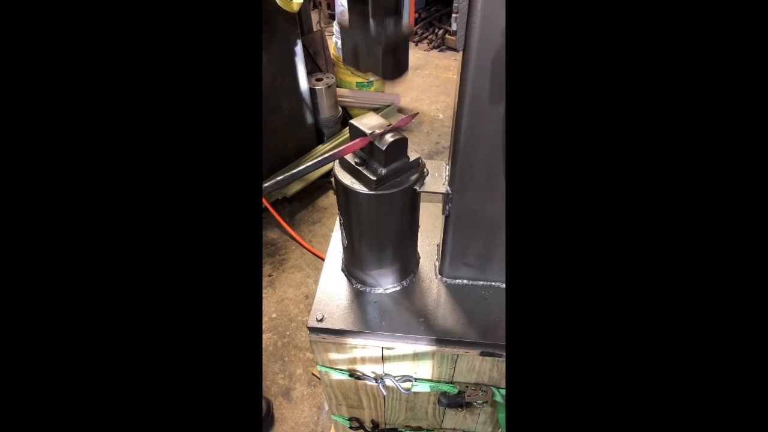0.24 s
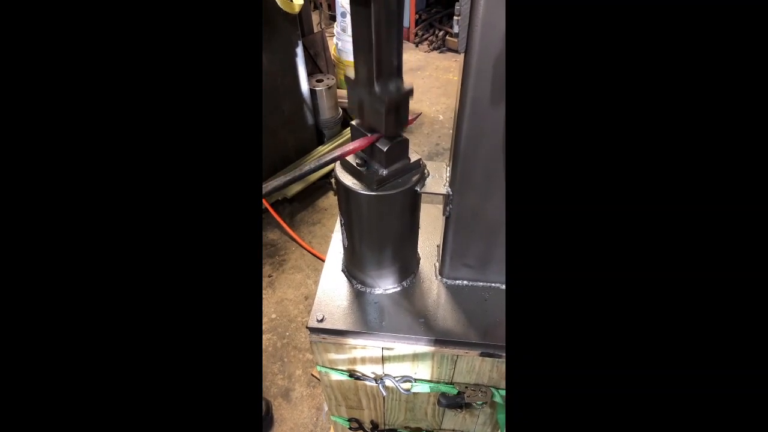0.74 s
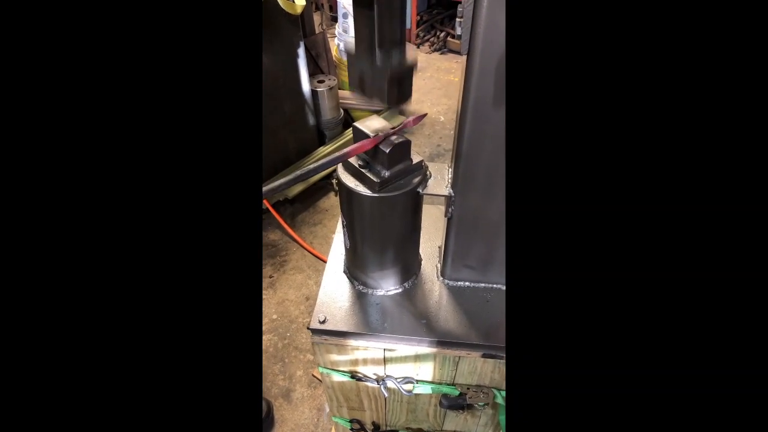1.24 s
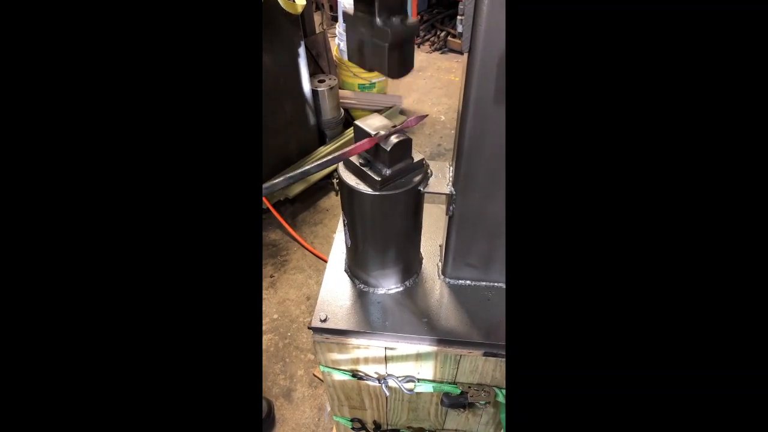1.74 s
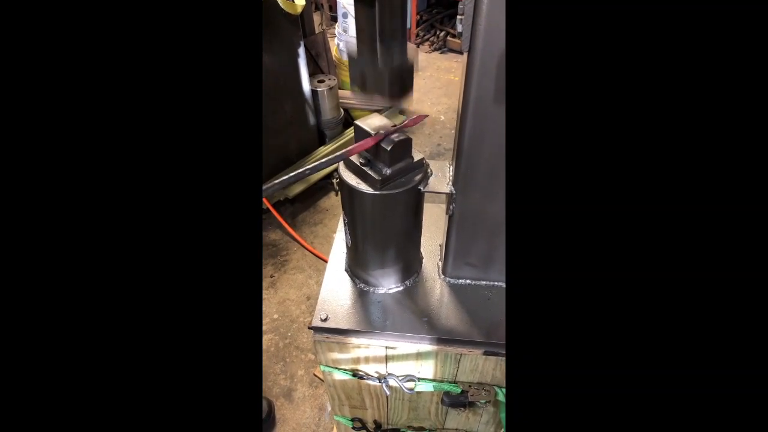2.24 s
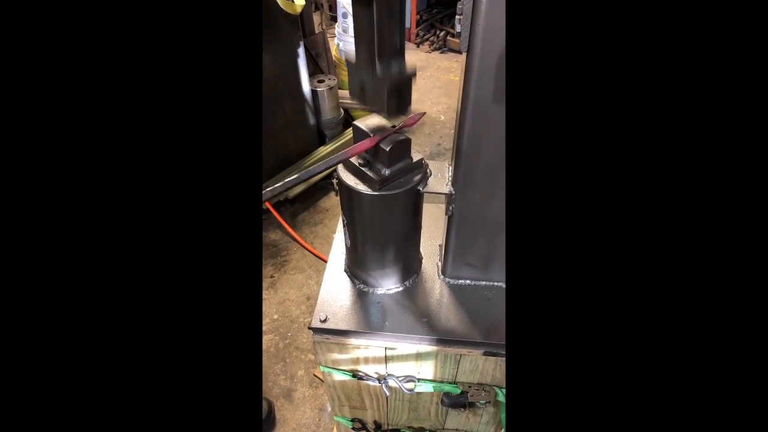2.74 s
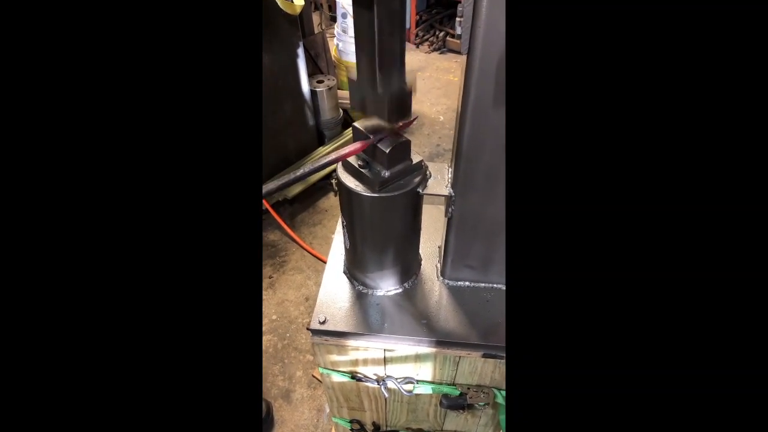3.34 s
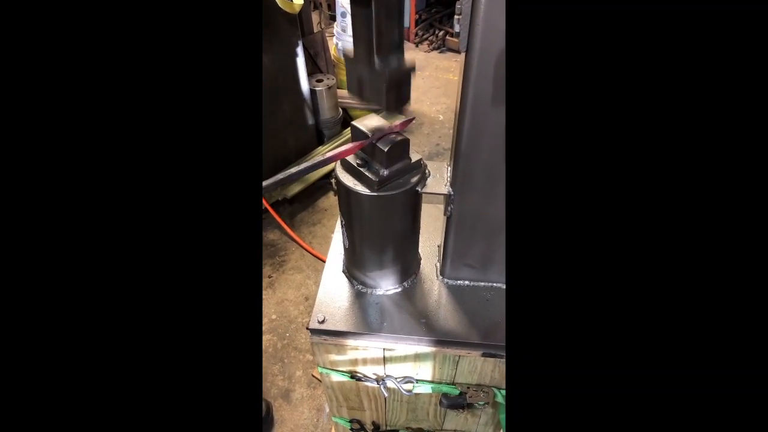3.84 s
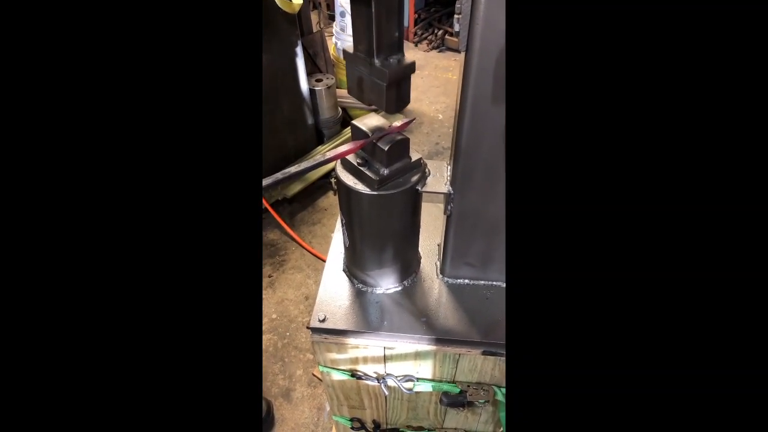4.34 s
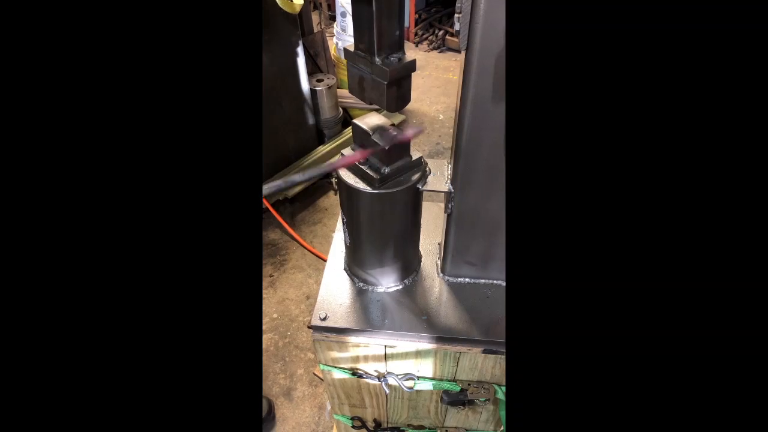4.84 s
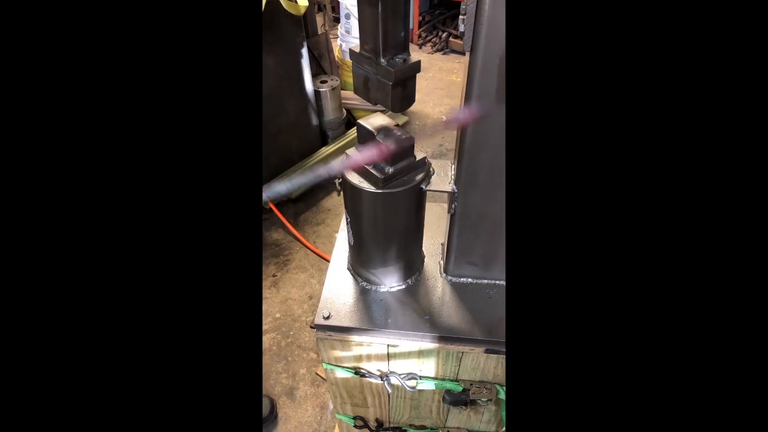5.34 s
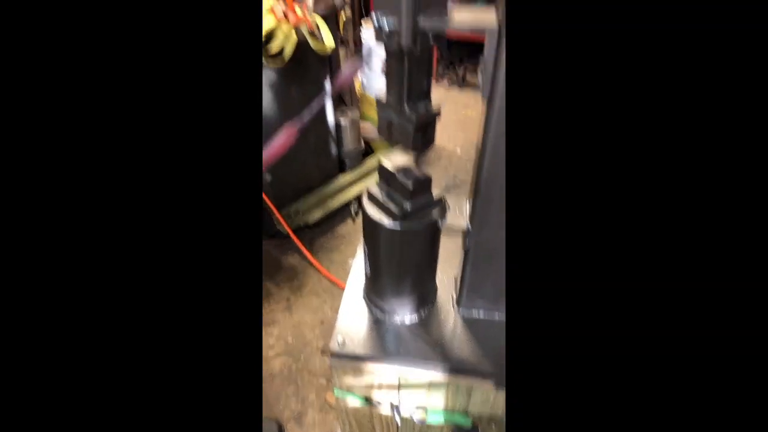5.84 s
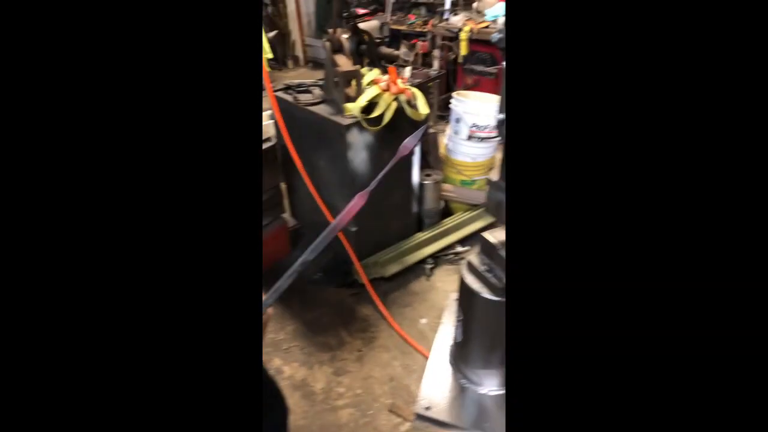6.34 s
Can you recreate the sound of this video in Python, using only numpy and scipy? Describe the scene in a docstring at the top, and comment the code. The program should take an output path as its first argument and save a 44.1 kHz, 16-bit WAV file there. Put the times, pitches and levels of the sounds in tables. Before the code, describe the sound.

Fast dull metallic thuds, four or five a second, beat through roaring exhaust air; the air abruptly cuts and a quiet motor chugging remains.

```python
"""Air-driven power hammer

A ram forges a hot steel bar close to a small microphone: clicks ring decaying modes for its blows
and for one faint low tone. Exhaust hiss, the valve's bright spits and the last wheeze of air are
coloured noise under envelopes. Once the air is shut off, a far compressor is left humming: ringing
strokes, hoots, tones, shop noise. A faint high rustle follows near the end."""
import sys
import numpy as np
from scipy import signal
from scipy.fft import rfft, irfft, next_fast_len
from scipy.io import wavfile

SR = 44100
rng = np.random.default_rng(int(sys.argv[2]) if len(sys.argv) > 2 else 0)


def int16_out(signal):
    """Quantize to a 16-bit WAV file."""
    q = np.round(np.clip(np.atleast_2d(signal).T, -1, 1) * 32767)
    wavfile.write(sys.argv[1], SR, q.astype(np.int16))


N = 291060

# Noise of the workshop. Each row: frequency in Hz, relative level in dB per Hz.
SHOP_COLOUR = [(30, -28), (54, -23), (68, 0), (110, -14.5), (160, -20), (230, -16), (300, -19), (430, -27),
               (660, -23.5), (850, -29.5), (1300, -29.5), (1700, -34.5), (2900, -36.5), (3600, -34),
               (5000, -39), (8000, -48), (11000, -55.5), (15800, -61.5)]
# Resonances in the shop noise. Each row: centre in Hz, width in Hz, lift in dB.
SHOP_RINGS = [(2160, 120, 2.5), (3420, 200, 3.5), (3800, 200, 2), (4700, 250, 5), (6430, 79.5, 3.5)]
# Compressor head and tank. Each row: mode in Hz, level in dB, t60 in seconds.
PUMP_MODES = [(83, -62.5, 0.27), (100.1, -52, .3), (474, -67, .3), (519, -47, 0.16), (559, -49, .12),
              (648, -57, 0.32), (847, -70, .4), (964, -53.5, 0.11), (1005, -54.5, 0.24), (1160, -63.5, .35),
              (1240, -50, .1), (1445, -72.5, 0.23)]
# Intake hoots. Each row: time into each turn in seconds, peak in dB, half width (to 1/e) in seconds.
CHUFFS = [(.0195, -44.5, .009), (.054, -49.5, .0045)]
# Steady tones of motors. Each row: frequency in Hz, level in dB rms.
HUM_TONES = [(65.5, -55), (68, -57), (120, -56.5), (331.7, -43)]
# Overtones of the stroke rate. Each row: multiple, level in dB rms.
STROKE_ORDERS = [(13, -57), (14, -64), (15, -61), (16, -53), (17, -61), (18, -56), (19, -56), (21, -61)]
# Thin motor whines. Each row: frequency in Hz, level in dB rms.
WHINE_TONES = [(1976, -72), (2161, -75.5), (2252, -73.5), (2697, -72.5), (3129, -79.5), (3343, -76.5),
               (3424, -73), (3849, -73.5), (4188, -73)]
# Compressor and shop, lower under the hammer. Each row: time in seconds, gain in dB.
COMPRESSOR_LEVEL = [(3.9, -4), (4.4, -1), (5.2, 0)]
# Faint high rustle. Each row: centre in seconds, peak in dB, half width (to 1/e) in seconds.
RUSTLES = [(6.5, -75, .02), (6.525, -66, 0.021), (6.585, -67, 0.025)]
# Rustle noise. Each row: frequency in Hz, relative level in dB per Hz.
RUSTLE_COLOUR = [(9000, -32), (9900, -3), (10800, 0), (11500, -25), (13000, -50)]
# Exhaust flow. Each row: time in seconds, level in dB.
EXHAUST_LEVEL = [(0, -14.5), (1, -14.5), (1.5, -15), (1.9, -17.5), (2.5, -14.5), (3, -15), (3.3, -16),
                 (4.1, -15), (4.285, -19), (4.315, -21), (4.345, -17), (4.365, -28.5), (4.4, -21.5)]
# Exhaust noise. Each row: frequency in Hz, relative level in dB per Hz.
HISS_COLOUR = [(100, -7), (300, -7), (600, -12.5), (900, -7.5), (1300, -5.5), (2000, -2.5), (3000, -3),
               (4300, -4.5), (5200, -1.5), (6000, -2), (8700, -3), (10000, -3.5), (12000, -5),
               (13300, -8.5), (14800, -5), (15800, -8.5)]
# Exhaust port resonances. Each row: centre in Hz, width in Hz, lift in dB (negative is a dip).
PORT_RINGS = [(1760, 19, 9.5), (1995, 120, 4), (2377, 86, 6.5), (2623, 96, 10), (2700, 31, 8),
              (3800, 300, 3), (4325, 40, 5), (5050, 40, 6), (5130, 39.5, 11), (5380, 120, 2.5),
              (5500, 38, 11), (5780, 40, 0.5), (5720, 47, 4.5), (6470, 270, 7), (7410, 51, 3.5),
              (7830, 72.3, 6), (8570, 170, 4.5), (9230, 170, 1.5), (10770, 150, 1), (11800, 100, 4.5),
              (12400, 220, 6.5), (1810, 81, -3.5), (2600, 60, -7.5), (2710, 30, -19.5), (4160, 90, -1.5),
              (5230, 65, 2.5), (6540, 100, -7), (9630, 100, -10.5), (13030, 93, -6)]
# Last air. Each row: time in seconds, level in dB.
WHEEZE_LEVEL = [(4.41, -71), (4.445, -34), (4.465, -37), (4.48, -56), (4.545, -49), (4.57, -57),
                (4.62, -85)]
# Wheeze noise. Each row: frequency in Hz, relative level in dB per Hz.
WHEEZE_COLOUR = [(900, -8.5), (1400, -6.5), (2000, -18.5), (2800, -5), (3600, -16.5), (6000, -30.5)]
# Wheeze resonances. Each row: centre in Hz, width in Hz, lift in dB.
WHEEZE_RINGS = [(1300, 120, 8), (2150, 110, 8), (2800, 80, 15), (4800, 150, 5), (6200, 150, 6)]
# Valve shifts. Each row: start in seconds, air pressure in dB.
VALVE_SHIFTS = [(0.11, -11.5), (0.326, -11.5), (0.54, -10.5), (0.757, -11.5), (0.977, -11), (1.192, -10.5),
                (1.41, -10), (1.626, -11.5), (1.847, -11.5), (2.071, -9.5), (2.295, -8.5), (2.512, -9.5),
                (2.72, -10), (2.934, -9.5), (3.147, -10), (3.373, -11), (3.589, -10), (3.804, -10.5),
                (4.033, -10), (4.298, -8.5)]
# Bright valve noise. Each row: frequency in Hz, relative level in dB per Hz.
SPIT_COLOUR = [(3000, -39.5), (6000, -18.5), (9000, -10.5), (12000, -10.5), (15500, -6)]
# Longer-running filling noise. Each row: frequency in Hz, relative level in dB per Hz.
RUSH_COLOUR = [(2500, -7), (5000, -33), (8000, 7), (11000, 9), (15500, -38)]
# Struck sounds: ram blows, and one faint low tone just before the blow at 1.903 s.
# Each row: time in seconds, strength in dB, then in dB: ring of the dies, sharpness
# of the knock, weight of the low modes, clank of the die faces, ring of the bar, ring of the plate's
# edge, damping of the tail, later dull puff.
STRUCK_SOUNDS = [(0.157, -5, -13.5, 1, 4.5, -16.5, -17.5, 3.5, -8.5, 3),
                 (0.376, -4.5, -13.5, -1, 1, -16, -21, 1.5, -9, 3),
                 (0.587, -4.5, -13.5, 0, 1.5, -13.5, -23.5, 1.5, -8, 3.5),
                 (0.806, -4, -14.5, -12, -0.5, -13, -16, -4.5, -11.5, 2.5),
                 (1.023, -5, -13.5, 0, 1, -18, -19.5, 4, -7.5, 1.5),
                 (1.237, -4, -12.5, -7.5, -0.5, -15.5, -16.5, 0, -11.5, 3),
                 (1.455, -4, -15, -4.5, 3.5, -13, -15, -1, -8, -2.5),
                 (1.674, -4, -27, -7, 3.5, -15.5, -7, 4, -20, 10.5),
                 (1.883, -19.5, -29.5, -23.5, 13, -33, -21.5, -7, -10, -22.5),
                 (1.903, -6, -13.5, -9.5, -5, -19.5, -8, -6.5, -13, -3),
                 (2.131, -11.5, -25, 2, -4.5, -9, -14, -0.5, -14, -2),
                 (2.564, -6, -32.5, -7, 4, -18, -7.5, -7, -21, -8.5),
                 (2.772, -5.5, -18, -3.5, 1, -16, -12.5, -12, -16, 9),
                 (2.983, -4.5, -41, -11.5, 4, -15.5, -8, -1.5, -7, 5.5),
                 (3.195, -5, -17.5, 2, 1.5, -31, -9.5, 5, -14.5, -17),
                 (3.426, -8, -22.5, 4, 2, -22, -6.5, 1, -15, 6),
                 (3.645, -10, -16.5, 7.5, 1.5, -9, -8, 0, -14, 2.5),
                 (3.86, -6, -29, -13, 0, -15, -28, -6, -19.5, 2),
                 (4.27, -30.5, -28, -19, -3.5, -22, -27, 1, -10, 0)]
# First contact. Each row: mode in Hz, level in dB, t60 in seconds.
KNOCK_MODES = [(570, -4, 0.0041), (727, -2.5, 0.04), (961, -12, 0.031), (2108, -10, 0.05),
               (2493, -15, 0.05)]
# Die faces. Each row: mode in Hz, level in dB, t60 in seconds.
CLANK_MODES = [(1540, -2, .04), (2040, 0, .06), (2350, -6, .04), (3980, -2, .04), (4080, 0, .05)]
# Anvil and base plate. Each row: mode in Hz, level in dB, t60 before damping in seconds.
BASE_MODES = [(194, -20, .15), (215, -12, .11), (270, -7.5, .07), (330, -5, .21), (386, -6, .2),
              (438, -8.5, .33), (480, -18, .14), (528, -23, .127), (608, -27, .14), (709, -18, .108),
              (761, -15, .2)]
# Dies. Each row: mode in Hz, level in dB, t60 before damping in seconds.
DIE_MODES = [(1498, -1.5, .28), (1522, -9, .12), (1547, 0, .3), (1578, -9, .1), (1680, -8, .1)]
# Held bar. Each row: mode in Hz, level in dB, t60 before damping in seconds.
BAR_MODES = [(1100, 0, .085)]
# Floor and loose parts. Each row: frequency in Hz, relative level in dB per Hz.
SHUDDER_COLOUR = [(70, -27), (130, -31), (220, -17), (400, -2), (700, -18), (1000, -21.5), (1500, -91.5)]
# Slab under the anvil. Each row: mode in Hz, level in dB, t60 in seconds.
FLOOR_MODES = [(68, -35, .25), (105.6, -20, 0.2), (156.5, -25, 0.3)]
# Puff as the ram rises. Each row: frequency in Hz, relative level in dB per Hz.
LIFT_COLOUR = [(500, -19), (900, -17.5), (1400, 19), (2200, -14), (4000, -37)]

ECHO_FIRST_S, ECHO_LAST_S = .002, .045   # nearby surfaces ripple the colour of steady noise
AIR_ECHO_DB, SHOP_ECHO_DB = -19, -12   # each echo
SHOP_DB = -44
STROKE_HZ, FIRST_STROKE_S = 16.585, .012
RETURN_LAG_S, RETURN_DB = .039, -2.5   # the piston knocks again, softer, on its way back
STROKE_SWELL_S, STROKE_START_DB = .01, -11   # a far stroke swells in rather than clicks
CHUFF_HZ = 670
BRIGHT_DB_PER_OCT = 1.54   # exhaust tilt about 4 kHz
SHUT_S, SHUT_DB_PER_S = 4.41, -200   # then the flow dies
SHUT_DULLS_PER_OCT = .3   # treble lost per octave for each dB of fall
SHUT_DULL_MAX_DB_PER_OCT = 14
DULL_LEAD_S, DULL_ABOVE_HZ = .05, 5000   # the treble starts to go before the flow does
CROSS_START_S, CROSS_RISE_S, CROSS_HOLD_S, CROSS_FALL_S, CROSS_DB = .003, .005, .008, .007, -5.5
LAND_START_S, LAND_RISE_S, LAND_HOLD_S, LAND_FALL_S = .002, .005, .009, .01
LAND_DB = -7.5   # depth for a strength of 0 dB
SPIT_RISE_S, SPIT_HOLD_S, SPIT_FALL_S, SPIT_DB = .0004, .001, .014, 3
FILL_START_S, FILL_RISE_S, FILL_FALL_S = .013, .013, .012   # start is after the shift
BRIGHT_HOLD_S, BRIGHT_DB = .022, -2.5   # bright filling stops as the ram arrives
RUSH_HOLD_S, RUSH_FALL_S, RUSH_DB = .04, .03, -8   # the duller part runs on
BASE_LAG_S, DIES_LAG_S = .006, .004   # the shock needs a moment to reach the larger parts
LOW_MODES_HZ, EDGE_MODES_HZ = 300, 700   # base modes below take the weight, above the edge ring
SHUDDER_DB, SHUDDER_T60_S = -9.5, .19
FLOOR_LAG_S, FLOOR_SOFT_S = .012, .0021
RING_SWELL_S, RING_START_DB = .02, -6   # the ring builds up as the shock spreads
RING_HOLD_S, RING_CHOKE_S = .041, .035   # it holds, then is damped over this time
LIFT_LAG_S, LIFT_DB = .13, -30
ROOM_T60_S, ROOM_DB, WALL_CUT_HZ = .33, -19.5, 3000   # t60 before wall losses
MIC_LOW_HZ, CUTOFF_HZ = 38.2, 15730
GAIN_KNEE_DB, GAIN_SLOPE_DB_PER_DB, GAIN_FOLLOW_S = -32, .032, .647


def from_db(db):
    """Decibels to gain."""
    return 10 ** (np.asarray(db) / 20)


def rms_one(x):
    """Scale to rms 1."""
    return x / np.sqrt(np.mean(x ** 2) + 1e-20)


def one_pole(x, seconds):
    """Smooth with the given time constant."""
    r = np.exp(-1 / (max(seconds, 1e-5) * SR))
    return signal.lfilter([1 - r], [1, -r], x)


def thin(x, hz):
    """High-pass: a body radiates little below its lowest modes."""
    return signal.sosfilt(signal.butter(2, hz, "high", fs=SR, output="sos"), x)


def drift(rate_hz):
    """Random wander of rms 1: noise at every 16th sample through two poles at rate_hz."""
    tau_s = 1 / (32 * np.pi * rate_hz)   # 16 times short, as the samples are sparse
    noise = rng.standard_normal(N // 16 + 4000)
    slow = one_pole(one_pole(noise, tau_s), tau_s)[3998:]
    return np.interp(np.arange(N) / 16, np.arange(len(slow)), rms_one(slow))


def coloured(spectrum, peaks=(), echo_db=-99):
    """Steady noise of rms 1 with a spectrum, bell-shaped lifts or dips and short echoes."""
    hz = np.arange(N // 2 + 1) * SR / N + 1
    table_hz, table_db = np.transpose(spectrum)
    level_db = np.interp(np.log(hz), np.log(table_hz), table_db, left=-70)
    for centre_hz, width_hz, lift_db in peaks:
        level_db += lift_db / (1 + (2 * (hz - centre_hz) / width_hz) ** 2)
    echoes = np.zeros(N)
    lags_s = rng.uniform(ECHO_FIRST_S, ECHO_LAST_S, size=10)
    echoes[(lags_s * SR).astype(int)] = from_db(echo_db)
    noise = rfft(rng.standard_normal(N))
    return rms_one(irfft(noise * from_db(level_db) * (1 + rfft(echoes)), N))


def gate(starts_s, heights, rise_s, hold_s, fall_s):
    """Sum of envelopes that rise, hold and fall in straight lines."""
    t = np.arange(N) / SR
    corners_s = np.cumsum([0, rise_s, hold_s, fall_s])
    return sum(h * np.interp(t - s, corners_s, [0, 1, 1, 0]) for s, h in zip(starts_s, heights))


def struck(times_s, strength_db, modes, scatter_db):
    """Clicks set each mode ringing, a little harder or softer from hit to hit."""
    at = np.clip(np.round(np.asarray(times_s) * SR).astype(int), 0, N - 1)
    chance = rng.standard_normal((len(at), len(modes)))
    out = np.zeros(N)
    for k, (hz, level_db, t60_s) in enumerate(modes):
        clicks = np.full(N, 1e-18)
        clicks[at] = from_db(strength_db + level_db + scatter_db * chance[:, k])
        r = from_db(-60 / (t60_s * SR))
        w = 2 * np.pi * hz / SR
        out += signal.lfilter([0, np.sin(w)], [1, -2 * r * np.cos(w), r * r], clicks)
    return out


def room(x):
    """Parallel feedback delays, dulled by the walls."""
    size = next_fast_len(N + SR)
    w = 2 * np.pi * np.arange(size // 2 + 1) / size
    dull = 1 / (1 + 1j * w * SR / (2 * np.pi * WALL_CUT_HZ))
    answer = 0
    for k, lag_s in enumerate(np.geomspace(.017, .047, num=9)):
        loop = from_db(-60 * lag_s / ROOM_T60_S) * dull * np.exp(-1j * w * round(lag_s * SR))
        answer = answer + (-1) ** k * loop / (1 - loop)
    return irfft(rfft(x, size) * answer, size)[:N]


def shop_noise():
    """Two noises trade places for a slowly shifting colour; the level throbs with the piston."""
    t = np.arange(N) / SR
    turn = 1.5 * drift(.6)
    one = coloured(SHOP_COLOUR, SHOP_RINGS, SHOP_ECHO_DB)
    other = coloured(SHOP_COLOUR, SHOP_RINGS, SHOP_ECHO_DB)
    throb_db = .68 * np.sin(4 * np.pi * STROKE_HZ * t)
    level = from_db(SHOP_DB + throb_db + .5 * drift(4.3))
    return level * (np.cos(turn) * one + np.sin(turn) * other)


def motor_tones():
    """Sines of motors and of the stroke rate's overtones, each wavering in level."""
    t = np.arange(N) / SR
    out = np.zeros(N)
    for hz, db in HUM_TONES:
        out += from_db(db + 1.8 * drift(8.3)) * np.sqrt(2) * np.sin(2 * np.pi * hz * t)
    for k, db in STROKE_ORDERS:
        phase = 2 * np.pi * (k * STROKE_HZ * t + rng.random())
        out += from_db(db + .8 * drift(3.4)) * np.sqrt(2) * np.sin(phase)
    for hz, db in WHINE_TONES:
        phase = 2 * np.pi * hz * t + drift(4)
        out += from_db(db + 3 * drift(1.5)) * np.sqrt(2) * np.sin(phase)
    return out


def chuffs():
    """The intake hoots softly twice a turn, at the same points of each turn."""
    late_s = np.arange(N) / SR % (1 / STROKE_HZ)
    shape = sum(from_db(db) * np.exp(-((late_s - s) / width_s) ** 2) for s, db, width_s in CHUFFS)
    return from_db(.8 * drift(5)) * shape * np.sin(2 * np.pi * CHUFF_HZ * late_s)


def pump():
    """Even strokes ring the head and tank, out and back; distance rounds them."""
    t = np.arange(N) / SR
    strokes_s = np.arange(FIRST_STROKE_S, N / SR - RETURN_LAG_S, 1 / STROKE_HZ)
    out = struck(strokes_s, 0, PUMP_MODES, scatter_db=.7)
    back = struck(strokes_s + RETURN_LAG_S, RETURN_DB, PUMP_MODES, scatter_db=.7)
    rounded = one_pole(one_pole(thin(out + back, hz=69), .00008), .00008)
    since_s = (t - FIRST_STROKE_S) % (1 / STROKE_HZ)
    return rounded * from_db(STROKE_START_DB * np.clip(1 - since_s / STROKE_SWELL_S, 0, 1))


def compressor():
    """Pump, intake and motors in the noise of the shop, under one level curve."""
    level_db = np.interp(np.arange(N) / SR, *np.transpose(COMPRESSOR_LEVEL))
    return from_db(level_db) * (pump() + chuffs() + motor_tones() + shop_noise())


def rustle():
    """Small soft brushes: very high noise in bell-shaped bursts."""
    t = np.arange(N) / SR
    shape = sum(from_db(db) * np.exp(-((t - s) / width_s) ** 2) for s, db, width_s in RUSTLES)
    return shape * coloured(RUSTLE_COLOUR)


def crossing_db():
    """The exhaust flow sags while the valve crosses over."""
    s = np.transpose(VALVE_SHIFTS)[0]
    return CROSS_DB * gate(s + CROSS_START_S, np.ones(len(s)), CROSS_RISE_S, CROSS_HOLD_S, CROSS_FALL_S)


def landing_db():
    """The air flow sags after each struck sound, as when the ram stops dead; more for a strong one."""
    s, strength_db = np.transpose(STRUCK_SOUNDS)[:2]
    return LAND_DB * gate(s + LAND_START_S, from_db(strength_db), LAND_RISE_S, LAND_HOLD_S, LAND_FALL_S)


def exhaust():
    """Turbulent air through the port; each band flutters partly with the others, partly alone."""
    t = np.arange(N) / SR
    shut_db = SHUT_DB_PER_S * np.maximum(t - SHUT_S, 0)
    early_db = SHUT_DB_PER_S * np.maximum(t - SHUT_S + DULL_LEAD_S, 0)
    dull_db_per_oct = np.maximum(SHUT_DULLS_PER_OCT * early_db, -SHUT_DULL_MAX_DB_PER_OCT)
    spectrum = rfft(coloured(HISS_COLOUR, PORT_RINGS, AIR_ECHO_DB))
    hz = np.arange(N // 2 + 1) * SR / N
    together_db = .9 * drift(11.43)
    edges_hz = np.geomspace(80, 17000, num=13)
    out = np.zeros(N)
    for low, high in zip(edges_hz, edges_hz[1:]):
        band = irfft(spectrum * ((hz >= low) & (hz < high)), N)
        tilt_db = BRIGHT_DB_PER_OCT * np.log2(low / 4000)
        dull_db = dull_db_per_oct * max(np.log2(high / DULL_ABOVE_HZ), 0)
        out += band * from_db(tilt_db + dull_db + together_db + drift(25))
    flow_db = np.interp(t, *np.transpose(EXHAUST_LEVEL))
    return out * from_db(flow_db + shut_db + crossing_db() + landing_db())


def wheeze():
    """The last air squeezes past the closing valve: resonant noise, fluttering fast."""
    level_db = np.interp(np.arange(N) / SR, *np.transpose(WHEEZE_LEVEL))
    return from_db(level_db + 2.5 * drift(40)) * coloured(WHEEZE_COLOUR, WHEEZE_RINGS, SHOP_ECHO_DB)


def valve():
    """Each shift spits briefly, then air rushes into the cylinder while the ram falls."""
    s, db = np.transpose(VALVE_SHIFTS)
    fill_s = s + FILL_START_S
    spit = gate(s, from_db(db + SPIT_DB), SPIT_RISE_S, SPIT_HOLD_S, SPIT_FALL_S)
    bright = gate(fill_s, from_db(db + BRIGHT_DB), FILL_RISE_S, BRIGHT_HOLD_S, FILL_FALL_S)
    rush = gate(fill_s, from_db(db + RUSH_DB), FILL_RISE_S, RUSH_HOLD_S, RUSH_FALL_S)
    bright_air = (spit + bright) * coloured(SPIT_COLOUR, PORT_RINGS, AIR_ECHO_DB)
    return bright_air + rush * from_db(landing_db()) * coloured(RUSH_COLOUR)


def base_plate(s, strength_db, weight_db, edge_db):
    """Anvil and plate modes; each struck sound weighs the low ones and the edge ring apart."""
    out = np.zeros(N)
    for mode in BASE_MODES:
        extra_db = 0
        if mode[0] < LOW_MODES_HZ:
            extra_db = weight_db
        elif mode[0] > EDGE_MODES_HZ:
            extra_db = edge_db
        out += struck(s + BASE_LAG_S, strength_db + extra_db, [mode], scatter_db=1.2)
    return thin(thin(out, hz=149.2), hz=149.2)


def shudder(s, strength_db):
    """The floor and loose parts rattle: noise that dies away after each shock."""
    shocks = np.full(N, 1e-18)
    shocks[np.round(s * SR).astype(int)] = from_db(strength_db + SHUDDER_DB)
    dying = signal.lfilter([1], [1, -from_db(-60 / (SHUDDER_T60_S * SR))], shocks)
    return one_pole(dying, .0093) * coloured(SHUDDER_COLOUR)


def choke(s, damp_db):
    """Gain on the ring of each struck sound: it swells, holds, then is damped until the next."""
    t = np.arange(N) / SR
    last = np.maximum(np.searchsorted(s, t) - 1, 0)
    since_s = t - s[last]
    swell_db = RING_START_DB * np.clip(1 - since_s / RING_SWELL_S, 0, 1)
    return from_db(swell_db + damp_db[last] * np.clip((since_s - RING_HOLD_S) / RING_CHOKE_S, 0, 1))


def struck_sounds():
    """A short knock and clank, then base, dies and bar ring on while the floor shudders."""
    (s, strength_db, dies_db, sharp_db, weight_db,
     clank_db, bar_db, edge_db, damp_db, puff_db) = np.transpose(STRUCK_SOUNDS)
    knock = thin(struck(s, strength_db + sharp_db, KNOCK_MODES, scatter_db=3), hz=427)
    clank = struck(s, strength_db + clank_db, CLANK_MODES, scatter_db=1.5)
    base = one_pole(base_plate(s, strength_db, weight_db, edge_db), .0001)   # hot steel is a soft contact
    dies = struck(s + DIES_LAG_S, strength_db + dies_db, DIE_MODES, scatter_db=1.5)
    bar = struck(s, strength_db + bar_db, BAR_MODES, scatter_db=.8)
    ring = (base + dies + bar) * choke(s, damp_db)
    slab = struck(s + FLOOR_LAG_S, strength_db + weight_db, FLOOR_MODES, scatter_db=1.5)
    floor = thin(one_pole(slab, FLOOR_SOFT_S), hz=60)
    puff = gate(s + LIFT_LAG_S, from_db(strength_db + LIFT_DB + puff_db), .003, .005, .008)
    lift = puff * coloured(LIFT_COLOUR)
    return one_pole(knock, .00008) + clank + ring + shudder(s, strength_db) + floor + lift


def scene():
    """Hammer near, compressor far, one point of pickup; only the struck sounds excite the room."""
    background = compressor() + rustle()
    air = exhaust() + wheeze() + valve()
    hits = struck_sounds()
    mono = background + air + hits + from_db(ROOM_DB) * room(hits)
    return np.array([mono, mono])


def record(dry):
    """The microphone drops deep bass, gain control eases loud stretches, peaks round, the top is cut."""
    heard = thin(dry, MIC_LOW_HZ)
    run_in = np.concatenate([heard[0, :SR], heard[0]])   # settles the level follower
    level_db = 10 * np.log10(one_pole(run_in ** 2, GAIN_FOLLOW_S)[SR:] + 1e-12)
    cut_db = GAIN_SLOPE_DB_PER_DB * np.maximum(level_db - GAIN_KNEE_DB, 0)
    rounded = np.tanh(heard * from_db(-cut_db))
    return signal.sosfilt(signal.ellip(14, .5, 75, CUTOFF_HZ, fs=SR, output="sos"), rounded)


dry = scene()
out = record(dry)
int16_out(out)
```